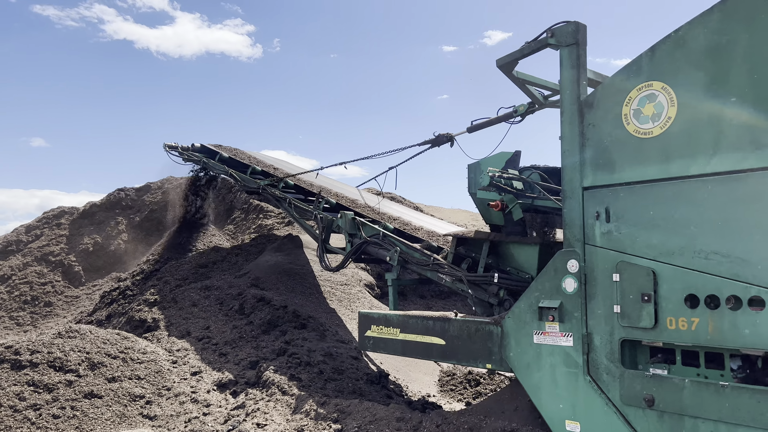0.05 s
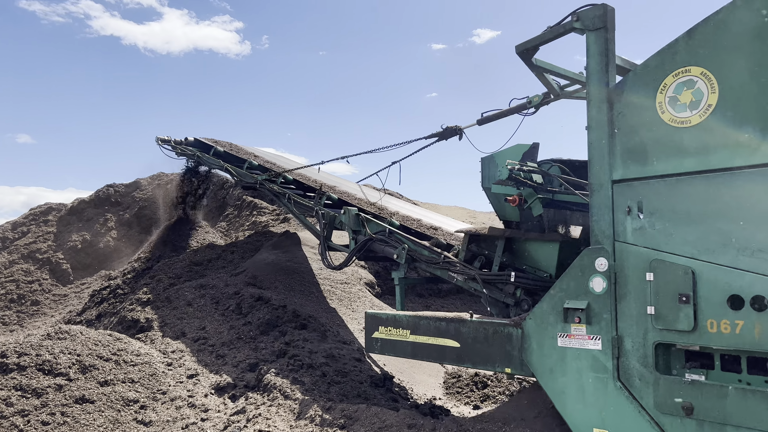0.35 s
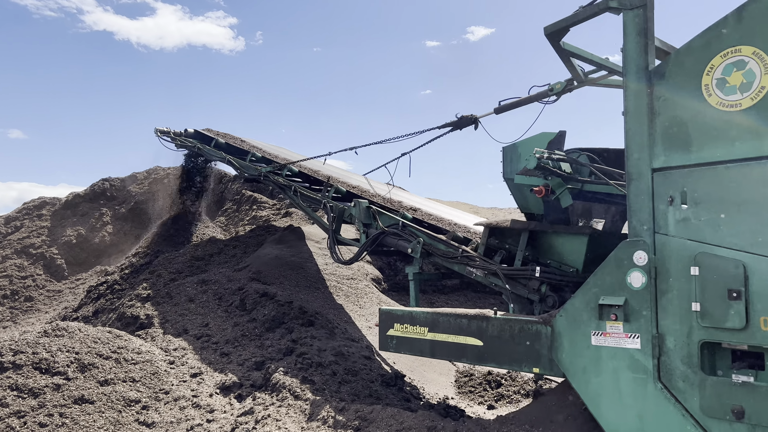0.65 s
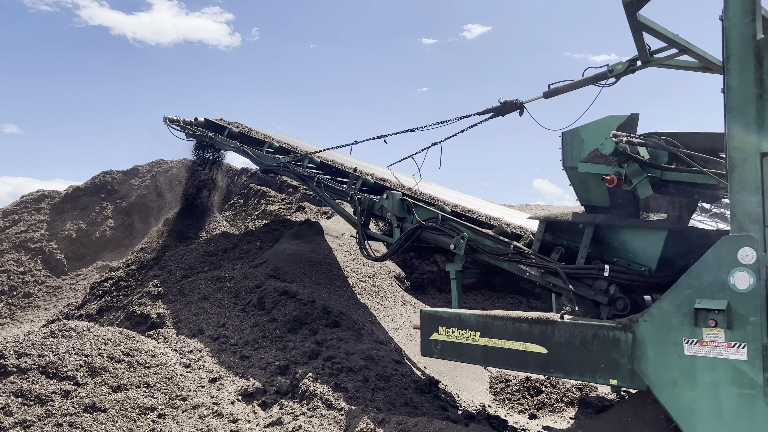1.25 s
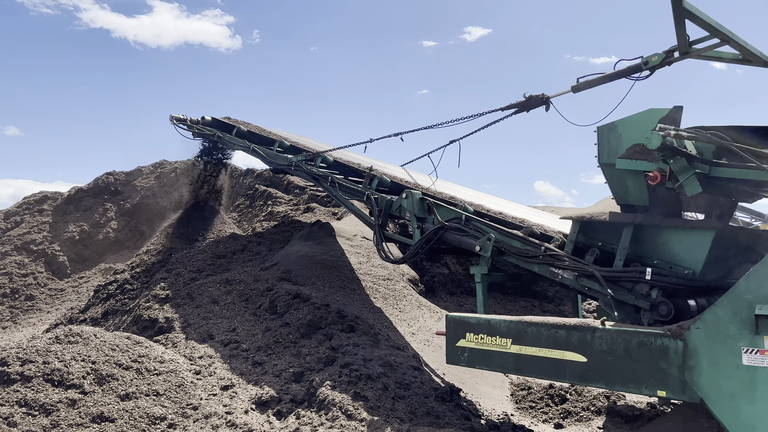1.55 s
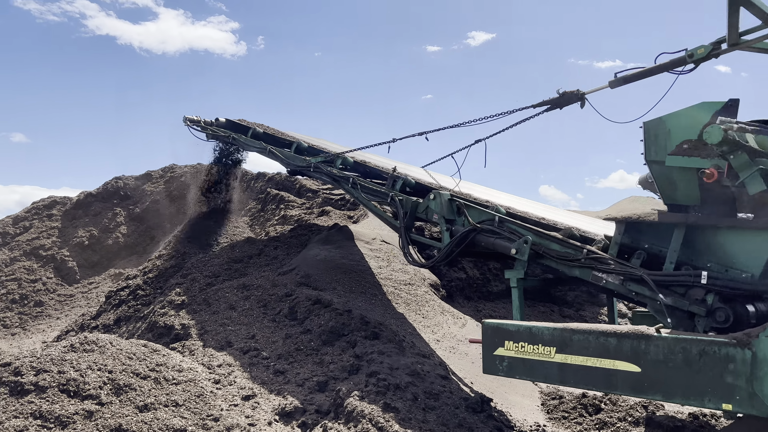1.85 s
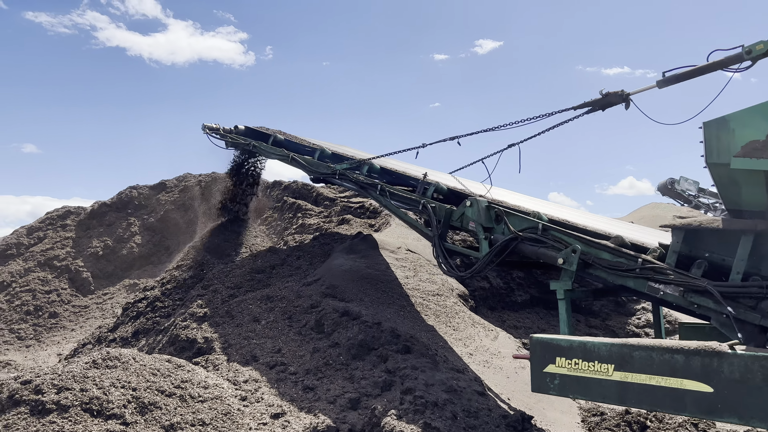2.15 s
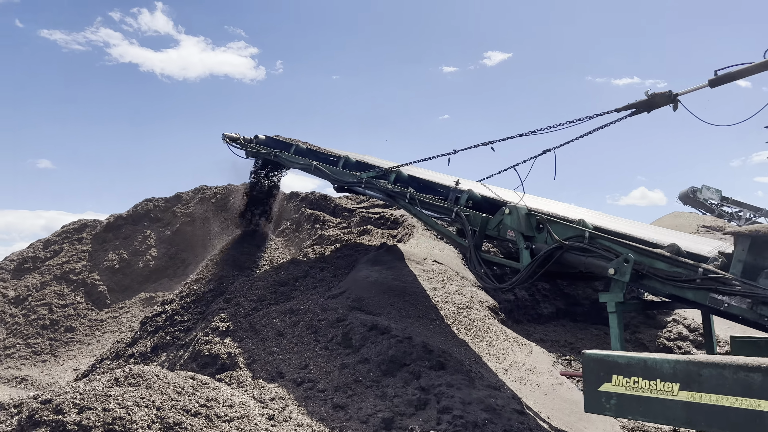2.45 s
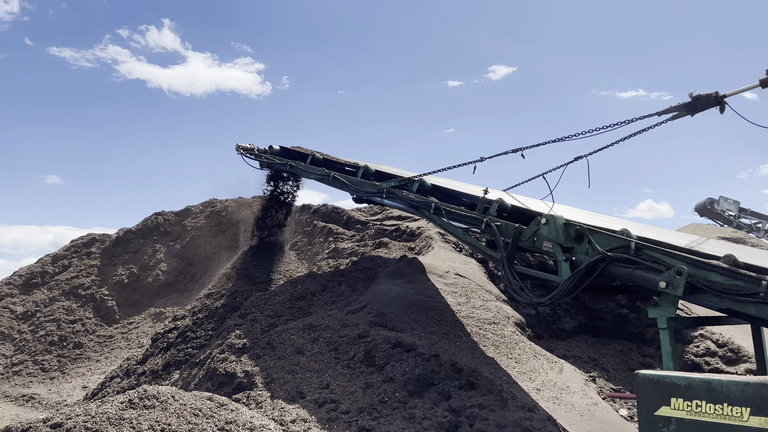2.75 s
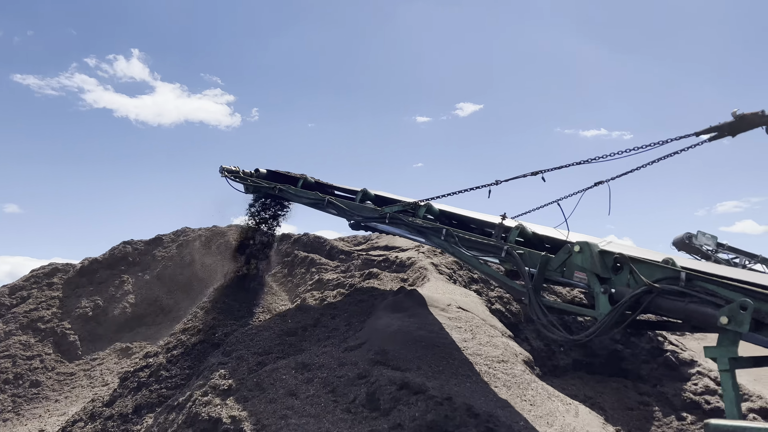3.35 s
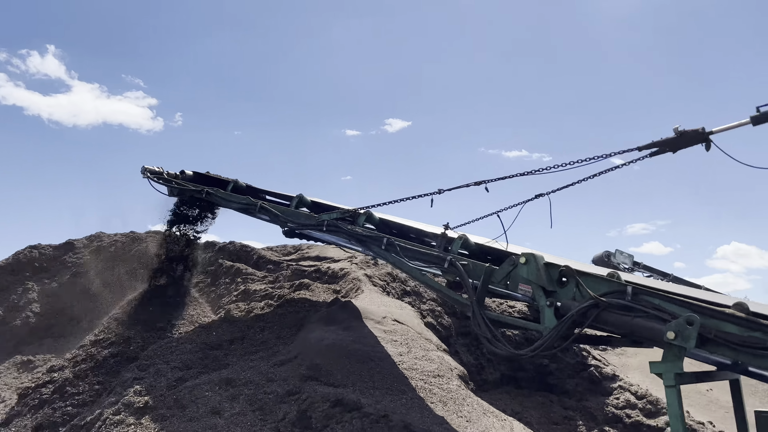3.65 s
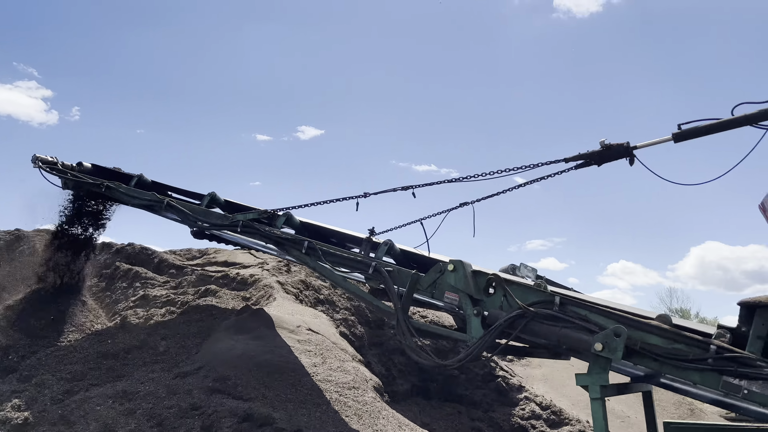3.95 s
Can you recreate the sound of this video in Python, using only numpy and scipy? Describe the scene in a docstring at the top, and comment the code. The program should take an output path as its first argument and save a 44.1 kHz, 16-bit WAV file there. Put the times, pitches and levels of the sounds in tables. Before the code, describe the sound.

The steady low roar of a diesel screening plant runs throughout, outdoors, with a short clank at first and faint chain tinks. The microphone moves along its side, and a pump's hum and small stone ticks grow toward the end.

```python
"""Outdoors at a screening plant, a six-cylinder diesel drones under the roar of its fan and moving parts.
Its lines, and the hum of a hydraulic pump, lie at multiples of the crank speed. Friction and impacts
excite resonances: grit rattles along the conveyor, the frame clanks and a loose chain link tinks.
The microphone moves away past the machine's side, so the exhaust note fades and the pump's hum grows."""
import sys
import numpy as np
from scipy import signal
from scipy.fft import rfft, irfft
from scipy.io import wavfile

SR = 44100
rng = np.random.default_rng(int(sys.argv[2]) if len(sys.argv) > 2 else 0)


def dump_mix(stems):
    """Bounce the given channels to the path in sys.argv[1] as a 16-bit WAV at rate SR."""
    frames = np.atleast_2d(stems).T  # one column per channel
    limited = np.clip(frames, -1, 1)  # hard clip at full scale
    pcm = np.round(limited * 32767).astype(np.int16)
    wavfile.write(sys.argv[1], SR, pcm)


N = 176400
T, HZ = np.arange(N) / SR, np.fft.rfftfreq(N, 1 / SR)
FIRINGS_PER_TURN = 3
STRONG_WAVER_DB, WEAK_WAVER_DB = 1.0, 3.5  # rms level wander of strong and of weak lines


def amp(db):
    """Amplitude ratio of a level in decibels."""
    return 10 ** (np.asarray(db) / 20)


def unit(x):
    """Normalisation to an rms of 1."""
    return x / np.sqrt(np.mean(x ** 2) + 1e-20)


def curve(points):
    """Linear interpolation of a time table at every sample."""
    return np.interp(T, *np.transpose(points))


def spectrum(points):
    """Interpolation of a table at every bin, on a logarithmic frequency axis."""
    hz, value = np.transpose(points)
    return np.interp(np.log(HZ + 1), np.log(hz + 1), value)


def drift(rate_hz):
    """Random fluctuation: low-passed noise of rms 1."""
    white = rfft(rng.standard_normal(N))
    return unit(irfft(white * (HZ > 0) * np.exp(-(HZ / rate_hz) ** 2), N))


def resonance(hz, half_width_hz):
    """Lorentzian gain of one mode at every bin."""
    return 1 / (1 + ((HZ - hz) / half_width_hz) ** 2)


def strike(start_s, db, decay_s):
    """Damping: the envelope of a blow decays exponentially."""
    return amp(db) * (T >= start_s) * np.exp(-abs(T - start_s) / decay_s)


def ring(envelope, gain):
    """Source and filter: the noise of rough contact excites a body, separately in each channel."""
    return irfft(rfft(rng.standard_normal((2, N)) * envelope) * unit(gain), N)


def noise_pair(gain):
    """Partial coherence: coloured noise of rms 1, partly alike in the two channels."""
    # Each row: frequency in Hz, coherence from 0 to 1.
    coherence = [(30, .98), (250, .985), (500, .93), (800, .85), (1400, .72), (2200, .6), (5000, .4),
                 (8000, .5), (9800, .93), (16000, .93)]
    left, independent = rfft(rng.standard_normal((2, N)))
    same = np.clip(spectrum(coherence), 0, 1)
    right = same * left + np.sqrt(1 - same ** 2) * independent
    return unit(irfft(np.array([left, right]) * gain, N))


def tone(cycles, db, waver_db):
    """Random modulation: a sinusoid wavers a little in phase and level."""
    angle = 2 * np.pi * (cycles + rng.random()) + 0.013 * drift(11)
    return np.sqrt(2) * amp(db + waver_db * drift(2.5)) * np.sin(angle)


def hiss():
    """Fast amplitude modulation gives grain to a fine, high hiss that grows near the end."""
    # Each row: frequency in Hz, relative spectral level in dB.
    colour = [(8000, -9), (9000, 15.5), (10300, -9), (11200, 13.5), (12200, 12), (13600, 10), (14600, -3),
              (15600, 10), (16200, -16)]
    # Each row: time in seconds, level in dB.
    levels = [(0, -52.5), (2, -51.5), (2.4, -49.5), (3.35, -51), (3.7, -46.5), (4, -45.5)]
    treble = noise_pair(amp(spectrum(colour)) / (1 + (7000 / (HZ + 1)) ** 8))
    return treble * amp(curve(levels) + drift(30) + 1.3 * drift(500))


def casing():
    """A panel of the casing drones at its resonance, loudest as the microphone passes it."""
    # Each row: time in seconds, level in dB.
    levels = [(0, -48), (1.5, -31), (2.3, -29.5), (4, -33.5)]
    return noise_pair(resonance(396, 46) ** 2) * amp(curve(levels))


def belt():
    """Friction excites narrow resonances: clods scrape dully on the belt, which squeals faintly."""
    # Each row: start in seconds, level in dB, frequency and half-width in Hz.
    scrapes = [(.511, -37, 2340, 160), (1.15, -34, 2040, 160), (2.115, -38, 2790, 200),
               (2.255, -35, 2070, 150), (2.28, -41, 2620, 200), (2.31, -42, 2980, 150),
               (2.435, -37.5, 2470, 250), (3.465, -31.5, 2260, 750)]
    # Each row: midpoint and half-length in seconds, frequency and half-width in Hz, left level in dB.
    squeals = [(0.7, 0.12, 5790, 8, -47), (2.1, 0.6, 6280, 200, -47)]
    out = sum(ring(strike(start, db, decay_s=0.065), resonance(hz, width))
              for start, db, hz, width in scrapes)
    for middle, half_length, hz, width, db in squeals:
        swell = amp(db) * np.exp(-((T - middle) / half_length) ** 4)
        out += ring(swell, resonance(hz, width)) * amp([[0], [-13]])
    return out


def chain_link():
    """Damped ringing: a loose link on the left tinks in short, rough, high pings that scoop upwards."""
    # Each row: start in seconds, level in dB, decay time in seconds.
    tinks = [(0, -27, 0.011), (.034, -28, 0.01), (.056, -28, .017), (0.094, -27.5, 0.012), (.206, -34, .01),
             (.53, -38, .02), (1.228, -41, .016), (1.45, -38, .016), (1.8, -38, 0.022), (1.837, -30, 0.014),
             (1.955, -34, .016), (2.485, -32.5, .018), (3.45, -33, 0.02), (3.585, -35, .025),
             (3.657, -34.5, 0.032)]
    # Lower clinks against the next link. Each row: start in seconds, left level in dB.
    knocks = [(0, -30), (1.844, -30.5)]
    rise_s, roughness_rate_hz = 0.0015, 700
    pitch_hz, scoop_hz, jitter_hz = 8020, 220, 150
    envelope = sum(strike(start, db, decay) * np.clip((T - start) / rise_s, 0, 1)
                   for start, db, decay in tinks)
    scoop = sum(strike(start, 0, decay_s=0.011) for start, _, _ in tinks)
    hz = pitch_hz - scoop_hz * scoop + jitter_hz * drift(roughness_rate_hz)
    roughness = 1 + 0.5 * drift(roughness_rate_hz)
    pings = envelope * unit(roughness * np.sin(2 * np.pi * np.cumsum(hz) / SR))
    blows = sum(strike(start, db, decay_s=0.015) for start, db in knocks)
    clink = ring(blows, resonance(3870, 100))
    return (pings + clink) * amp([[0], [-19]])


def frame():
    """Modal response: blows and rebounds make the steel frame clank on the left."""
    # Each row: start in seconds, left level in dB, spectral tilt in dB per octave.
    clanks = [(0.034, -14.5, 6.5), (.062, -25, -12), (.104, -24.5, -17), (.144, -16.5, 2), (.152, -19, -15)]
    # Each row: frequency and half-width in Hz, relative level in dB.
    modes = [(2050, 70, 2), (2920, 110, -1.5), (3230, 110, 0), (4100, 250, -4), (5280, 140, -11),
             (6460, 180, 2.5), (7890, 140, -2), (8770, 300, -7.5)]
    response = sum(amp(db) * resonance(hz, width) for hz, width, db in modes)
    octaves = np.log2(np.maximum(HZ / modes[0][0], 1))  # above the lowest mode
    out = sum(ring(strike(start, db, decay_s=0.009), response * amp(tilt * octaves))
              for start, db, tilt in clanks)
    return out * amp([[0], [-19]])


def soil():
    """Sliding friction: soil hisses along the conveyor and sets the steel chute ringing."""
    # Each row: frequency in Hz, relative spectral level in dB.
    left_colour = [(2500, -0.5), (3300, -8), (3900, -0.5), (4700, -0.5), (5600, -1.5), (6300, 0.5),
                   (7200, -6.5), (8200, -5.5), (9000, -29.5), (11000, -76)]
    right_colour = [(2500, 1), (3400, -5), (4100, -8), (5200, -14), (6300, -16), (7400, -12), (8200, -14),
                    (9000, -18), (11000, -80)]
    # Each row: time in seconds, level in dB.
    slide_levels = [(0, -40), (1.2, -38.5), (2.2, -37), (2.8, -38), (3.3, -38), (4, -37)]
    chute_levels = [(0, -73), (1.8, -48), (3.1, -42), (4, -49)]
    colour = amp([spectrum(left_colour), spectrum(right_colour)])
    high_pass = HZ ** 2 / (HZ ** 2 + 1500 ** 2)
    slide = ring(amp(curve(slide_levels) + drift(21)), colour * high_pass)
    chute = ring(amp(curve(chute_levels)), resonance(4020, 260))
    return slide + chute * amp([[0], [-9.5]])


def grains(per_s=170, spread_db=8, decay_s=0.001):
    """A Poisson process: tiny impacts add in energy to an envelope of rms 1."""
    hits = (rng.random(N) < per_s / SR) * amp(spread_db * np.minimum(rng.exponential(1, N), 3))
    energy = signal.lfilter([1], [1, -np.exp(-2 / (decay_s * SR))], hits ** 2)
    return unit(np.sqrt(energy + 1e-12))


def gravel():
    """Impact noise: stones crackle on steel, each size at its own pitch; larger ones strike harder."""
    # Each row: frequency in Hz, relative spectral level on the left and on the right in dB.
    colour = [(2000, -12, -29), (3500, -5.5, -21), (4760, -3, -5), (5560, 5.5, -8), (6040, 4.5, -20),
              (7300, -7, -4), (8500, -7, -15), (10300, -34, -35), (16000, -21, -24)]
    # Each row: time in seconds, level in dB.
    rattle_levels = [(0, -53.5), (1.2, -54), (2.2, -48), (2.8, -53), (3.25, -44), (3.68, -43.5),
                     (3.82, -44.5), (4, -40)]
    # Each row: start in seconds, level in dB, decay time in seconds.
    large_stones = [(0.326, -31, 0.0036), (0.563, -33, .005), (.838, -33.5, 0.019), (.9, -32.5, 0.011),
                    (1.449, -30, 0.013), (1.582, -30, 0.019), (1.781, -25.5, 0.011), (2.467, -27, .004),
                    (2.678, -29, .004), (2.774, -28, 0.0046), (2.963, -19, 0.0024), (3.002, -23, 0.0022),
                    (3.228, -42, 0.0073), (3.254, -32, .004), (3.273, -24, 0.0035), (3.372, -24.5, .007),
                    (3.415, -31, 0.0039), (3.794, -21.5, 0.0025), (3.821, -24, .002), (3.849, -29, .003),
                    (3.911, -22, 0.0015), (3.954, -26, 0.0027)]
    hz, left, right = np.transpose(colour)
    steel = amp([spectrum(np.c_[hz, db]) for db in (left, right)])
    level = amp(curve(rattle_levels) + 2 * drift(12))
    rattle = sum(ring(grains() * level, steel * resonance(pitch_hz, 1200))
                 for pitch_hz in (5430, 6300, 7300))
    blows = np.sqrt(sum(strike(*stone) ** 2 for stone in large_stones))
    return rattle + ring(blows, steel)


def roar(crank):
    """Broadband fan and casing noise; the firings and the crank modulate its clatter in amplitude."""
    # Each row: frequency in Hz, relative spectral level in dB.
    colour = [(20, -80), (30, -67), (40, -44), (60, -40), (125, -41.5), (165, -36), (205, -47.5),
              (255, -50.5), (345, -56), (470, -53.5), (620, -61), (860, -52), (1080, -54), (1380, -57),
              (1560, -57.5), (1900, -63.5), (2600, -66.5), (3400, -73), (5000, -88.5), (9000, -87.5),
              (12000, -103), (16000, -105)]
    # Each row: time in seconds, then dB of rumble, boom, body and low, middle and high clatter.
    band_levels = [(0, -27, -18.5, -22.5, -31.5, -28.5, -35), (.5, -24.5, -20.5, -23, -30.5, -29.5, -37.5),
                   (1.2, -26, -24, -24, -28, -28.5, -39), (2, -25.5, -22.5, -26, -27.5, -29, -40),
                   (2.8, -25.5, -27.5, -25.5, -35.5, -29, -51), (3.4, -24.5, -29, -24, -33.5, -30.5, -46),
                   (4, -27.5, -26.5, -24, -30.5, -30.5, -62)]
    # Crossovers between the six bands, in Hz.
    edges_hz = [118, 215, 530, 770, 2150]
    shape = amp(spectrum(colour))
    low_passes = [0] + [1 / (1 + (HZ / hz) ** 12) for hz in edges_hz] + [1]
    times, *levels = np.transpose(band_levels)
    bands = [noise_pair(shape * np.sqrt(abs(upper - lower))) * amp(np.interp(T, times, db))
             for lower, upper, db in zip(low_passes, low_passes[1:], levels)]
    throb = 1 + 0.14 * np.cos(2 * np.pi * FIRINGS_PER_TURN * crank) + 0.11 * np.cos(2 * np.pi * crank)
    clatter = sum(band * amp(0.7 * drift(20)) for band in bands[3:])
    return sum(bands[:3]) + throb * clatter


def screen(shake_hz=40.2):
    """Forced vibration: the shaking screen radiates one deep tone."""
    return tone(shake_hz * T, -39.5, WEAK_WAVER_DB)


def pump(crank, pulses_per_turn=25 / 3):
    """Periodic pulsation: the hydraulic pump hums, with its octave, in step with the crank."""
    # Each row: time in seconds, level of the fundamental in dB.
    levels = [(0, -27.5), (1.3, -29), (2.35, -26), (2.7, -23.5), (3.3, -21.5), (4, -19.5)]
    cycles = pulses_per_turn * crank
    return tone(cycles, curve(levels), STRONG_WAVER_DB) + tone(2 * cycles, -38.5, WEAK_WAVER_DB)


def engine(crank):
    """Harmonic series: the diesel's cycle takes two turns, so its lines lie at whole and half orders."""
    # Each row: time in seconds, level in dB.
    firing_levels = [(0, -23.5), (.25, -23.5), (.7, -20), (1.4, -19.5), (1.7, -19.5), (2, -22),
                     (2.5, -21.5), (3.1, -26.5), (3.5, -26), (4, -26.5)]
    third_harmonic_levels = [(0, -41), (.4, -40), (.9, -34), (1.25, -29), (1.7, -21.5), (2.1, -23),
                             (2.4, -27), (2.6, -33.5), (2.85, -25.5), (3.2, -21.5), (4, -24)]
    tenth_order_levels = [(0, -27), (.5, -26), (1.2, -32), (2.3, -31), (3, -45), (4, -57)]
    # Further lines as multiples of the crank speed, and their levels in dB at mid-scene.
    orders = [12.5, 18, 20, 25.5, 27, 30, 34, 36, 40, 54]
    orders_db = [-39.5, -39, -42.5, -50, -43.5, -44, -50, -42, -41, -48]
    fade_db_per_s, comb_db_per_octave = 3.5, -5
    out = tone(FIRINGS_PER_TURN * crank, curve(firing_levels), STRONG_WAVER_DB)
    out += tone(3 * FIRINGS_PER_TURN * crank, curve(third_harmonic_levels), STRONG_WAVER_DB)
    out += tone(10 * crank, curve(tenth_order_levels), STRONG_WAVER_DB)
    fade_db = fade_db_per_s * (T.mean() - T)  # the distance grows
    for order, db in zip(orders, orders_db):
        out += tone(order * crank, db + fade_db, WEAK_WAVER_DB)
    comb = np.zeros(N)  # faint lines at every half order, fading half as fast
    for order in np.arange(9.5, 48, 0.5):
        gain = amp(-46 + comb_db_per_octave * np.log2(order / 9))
        comb += np.sqrt(2) * gain * np.sin(2 * np.pi * (order * crank + rng.random()))
    return out + comb * amp(fade_db / 2)


def scene():
    """Superposition of all sources; the machine stands to the right, so it is heard later on the left."""
    # Each row: time in seconds, governed crank speed in turns per second.
    speed = [(0, 32.38), (.45, 32.26), (.9, 32.13), (1.5, 32.25), (2.3, 32.34), (2.75, 32.19), (3.4, 32.27),
             (4, 32.22)]
    # Each row: frequency in Hz, left minus right level in dB.
    balance = [(30, 0.5), (330, .5), (470, -1.5), (650, -1.5), (900, -3.5), (1200, 0.8), (2400, -2),
               (3600, 3.5), (16000, -1)]
    # Each row: frequency in Hz, left minus right phase in radians.
    phase = [(0, 0), (500, -1.5), (1000, -2.3), (1300, -2.8), (1900, -4.3), (2400, -7.6), (6100, -17),
             (7840, -25), (8800, -25.7), (15500, -37.7)]
    crank = np.cumsum(curve(speed)) / SR  # turns
    left, right = rfft(engine(crank) + pump(crank) + screen() + roar(crank) + casing() + hiss())
    lean = amp(spectrum(balance) / 2)
    lag = np.exp(1j * np.interp(HZ, *np.transpose(phase)))
    machine = irfft(np.array([left * lean * lag, right / lean]), N)
    return machine + soil() + gravel() + chain_link() + frame() + belt()


def record(dry):
    """Band limiting: a steep low-pass filter removes the highest treble."""
    low_pass = signal.firwin(511, 15900, window=("kaiser", 9), fs=SR)
    return signal.oaconvolve(dry, low_pass[None], "same")


dry = scene()
out = record(dry)
dump_mix(out)
```